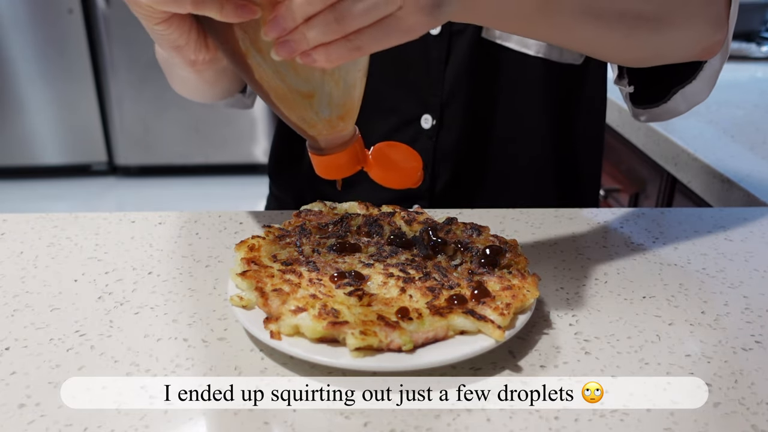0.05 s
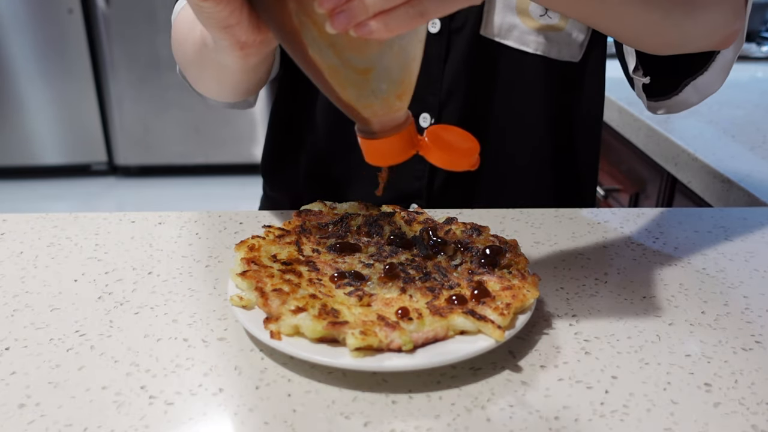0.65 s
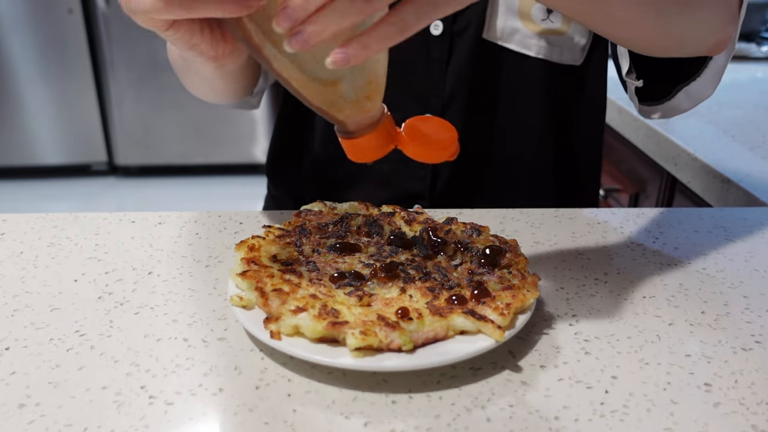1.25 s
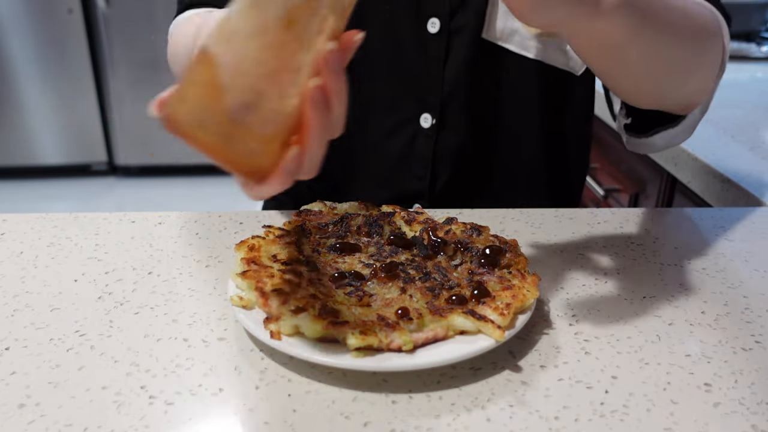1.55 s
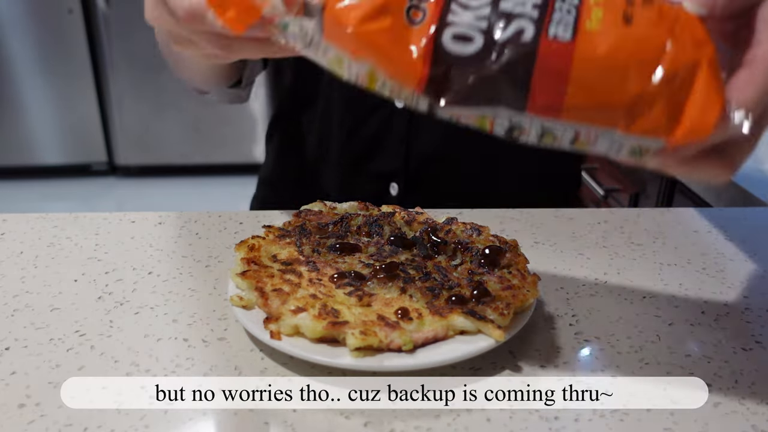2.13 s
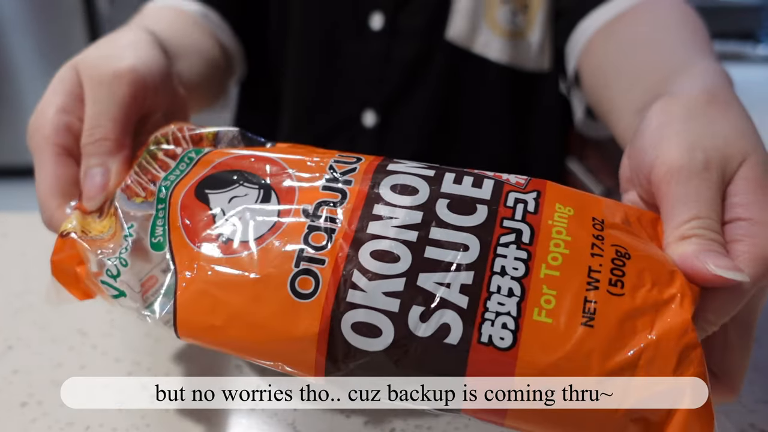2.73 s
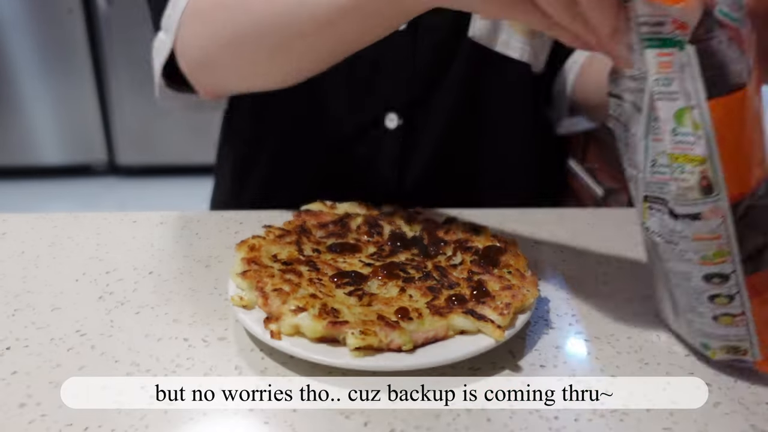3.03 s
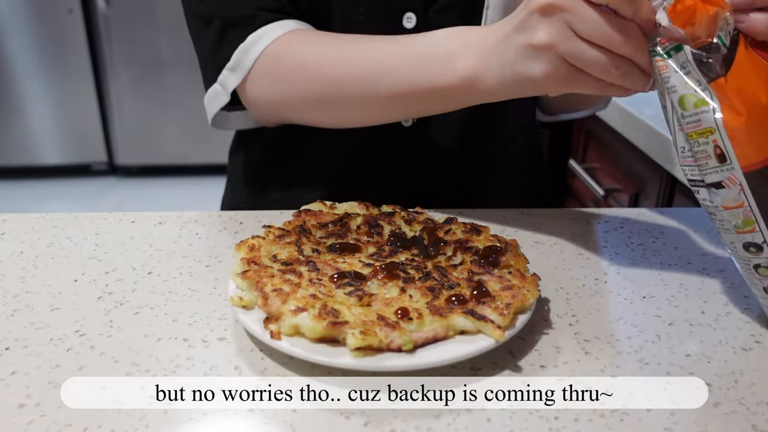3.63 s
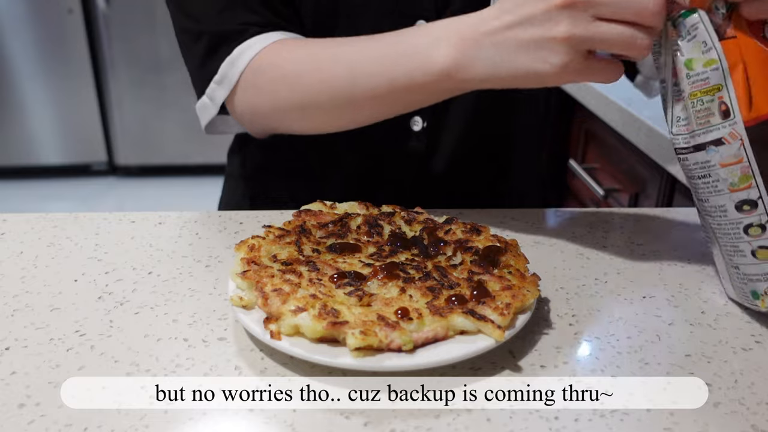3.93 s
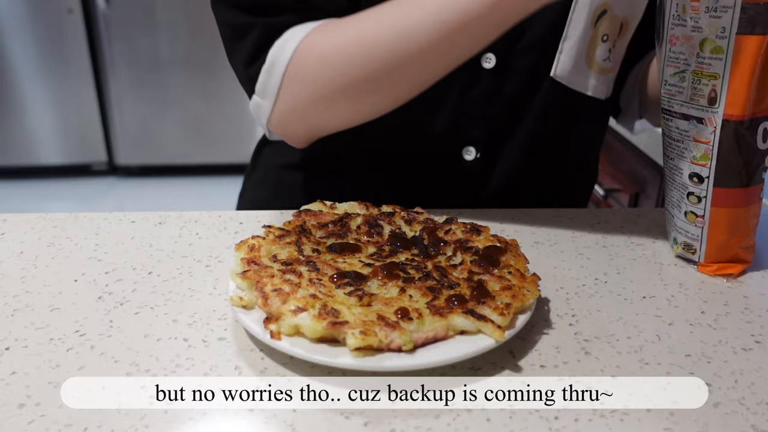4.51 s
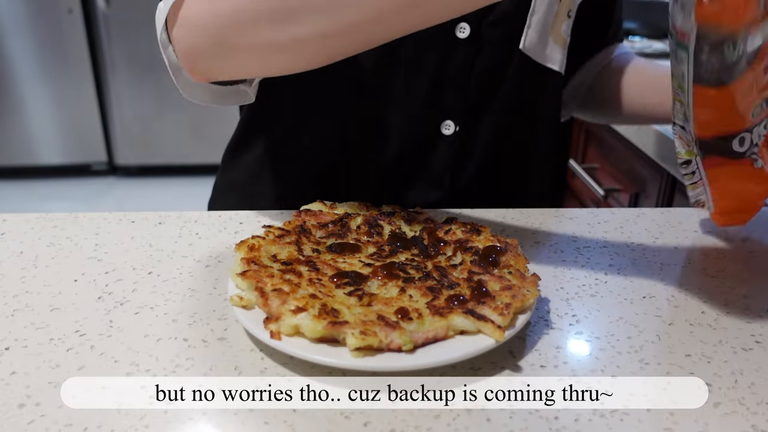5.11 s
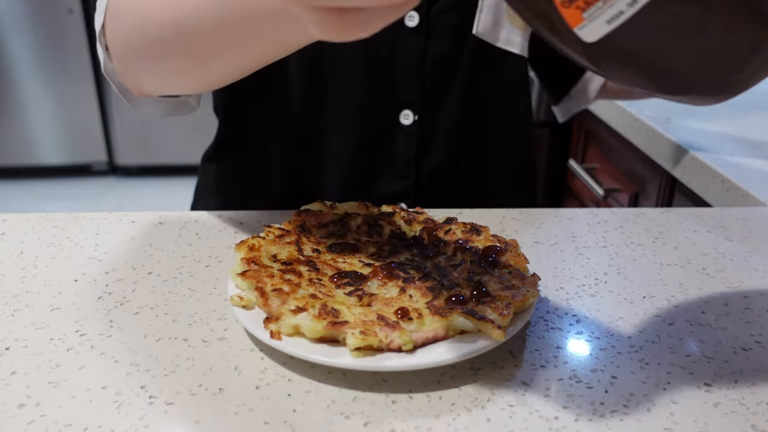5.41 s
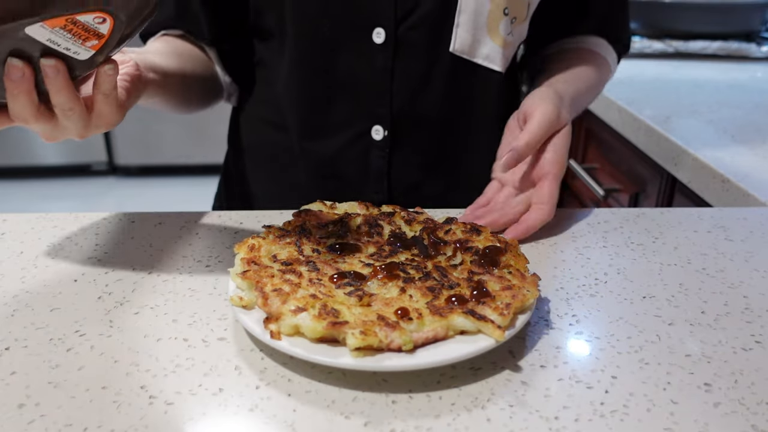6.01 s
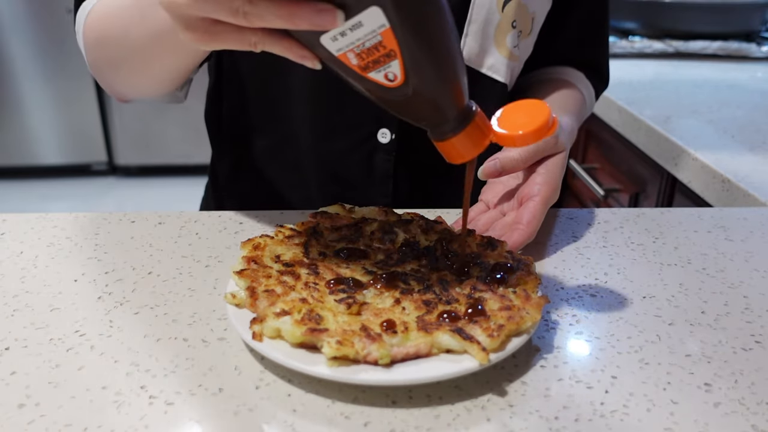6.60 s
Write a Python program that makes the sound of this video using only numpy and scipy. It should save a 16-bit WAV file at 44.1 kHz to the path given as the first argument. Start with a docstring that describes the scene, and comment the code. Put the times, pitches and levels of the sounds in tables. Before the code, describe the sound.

Close up in a small, hard-walled kitchen, quick squeezes force the last sauce from a plastic bottle in hissing, bubbly spurts, and the dented plastic cracks twice. Next a full bottle is handled and unwrapped: its film bag crackles densely, the bottle bumps softly on the counter, and one loud snap stands out late on. The crinkling dies away, leaving the faint appliance hum that runs underneath throughout.

```python
"""Over a faint appliance hum, a nearly empty plastic squeeze bottle spits air and the last of its sauce:
wet sputters at the nozzle, bursting bubbles, and two cracks as the dented wall springs back.
Then a full bottle is handled in its film bag, stood on the kitchen counter and unwrapped: the film
crinkles and snaps as it buckles, and the bottle lands dull thuds. The small hard room rings a little."""
import sys
import numpy as np
from scipy import signal
from scipy.io import wavfile
from scipy.ndimage import uniform_filter1d, minimum_filter1d

SR = 44100
rng = np.random.default_rng(int(sys.argv[2]) if len(sys.argv) > 2 else 0)


def to_wav(sig):
    """Store sig (one row per channel, or 1-D mono) as 16-bit WAV at the path in sys.argv[1].

    Samples outside -1..1 are clipped; the rate is SR.
    """
    pcm = np.clip(np.atleast_2d(sig), -1, 1) * 32767
    pcm = np.round(pcm).astype(np.int16)
    wavfile.write(sys.argv[1], SR, pcm.T)  # frames by channels


N = 297669
TIME_S = np.arange(N) / SR


def gain_of(db):
    """Decibels to gain."""
    return 10 ** (np.asarray(db) / 20)


def unit_rms(x):
    """Scales to rms 1."""
    return x / np.sqrt(np.mean(x ** 2) + 1e-20)


def curve_at(points, hz):
    """Reads a curve on a log-frequency axis."""
    freqs, values = np.transpose(points)
    return np.interp(np.log(hz + 1), np.log(freqs + 1), values)


def add(mix, start_s, sound):
    """Lays a sound into the mix."""
    part = mix[max(round(start_s * SR), 0):][:len(sound)]
    part += sound[:len(part)]


def band(x, low_hz, high_hz, order=2):
    """Band-pass, kept below half the sample rate."""
    high_hz = min(high_hz, SR / 2.1)
    low_hz = min(low_hz, high_hz / 2 ** 0.1)
    return signal.sosfilt(signal.butter(order, [low_hz, high_hz], "band", fs=SR, output="sos"), x)


def resonate(x, hz, width_hz):
    """One resonant peak."""
    return signal.lfilter(*signal.iirpeak(hz, hz / width_hz, fs=SR), x)


def colour(x, eq, size=2048):
    """Minimum-phase EQ with power gain 1."""
    log_gain = np.log(gain_of(curve_at(eq, abs(np.fft.fftfreq(size, 1 / SR)))))
    taps = np.fft.ifft(np.exp(np.conj(signal.hilbert(log_gain)))).real[:size // 2]
    return signal.oaconvolve(x, taps / np.linalg.norm(taps))[:len(x)]


def burst(decay_s):
    """Noise that dies away exponentially."""
    t = np.arange(int(10 * decay_s * SR) + 256) / SR
    return rng.standard_normal(len(t)) * np.exp(-t / decay_s)


def sized(x, length_s):
    """Gives a hit the energy of rms 1 held for length_s."""
    return x / np.linalg.norm(x) * np.sqrt(length_s * SR)


def clicks(per_s, spread_db):
    """Random clicks: many small, a few large."""
    at = np.flatnonzero(rng.random(N) < per_s / SR)
    train = np.zeros(N)
    train[at] = rng.choice([-1, 1], len(at)) * gain_of(spread_db * rng.exponential(1, len(at)).clip(0, 4))
    return train


def levelled(x, size):
    """Rides the rms toward 1 over stretches of size samples, leaving the grain."""
    power = abs(uniform_filter1d(uniform_filter1d(x ** 2, size), size))
    return x / np.sqrt(power + np.mean(x ** 2) / 1000)


def gate(start_s, end_s, fade_s):
    """A soft on-off envelope."""
    return np.clip(np.minimum(TIME_S - start_s, end_s - TIME_S) / fade_s + .5, 0, 1)


def push(start_s, end_s, attack_s, sag_db_per_s, release_s):
    """Envelope of one push of the hand: a quick rise, a sagging hold, an exponential release."""
    rise = np.clip((TIME_S - start_s) / attack_s + .5, 0, 1)
    sag = gain_of(-sag_db_per_s * np.clip(TIME_S - start_s, 0, end_s - start_s))
    return rise * sag * np.exp(-np.maximum(TIME_S - end_s, 0) / release_s)


# EQ of the ventilation noise: freq_hz, gain_db
VENT_EQ = [(25, -19), (70, -28), (110, -19), (170, -3.5), (280, -2), (430, 2), (620, -3.5), (950, -12.5),
           (1400, -12), (2500, -18.5), (4700, -27), (6500, -29.5), (11000, -31.5), (16000, -36.5)]
# faint motor tones, stepping in pitch: start_s, end_s, pitch_hz, level_db
HUM_TONES = [(0, 1.66, 355, -50), (1.66, 5.94, 285, -49), (5.94, 6.8, 318, -49), (5.94, 6.8, 544, -56),
             (0, 6.8, 118, -68)]


def appliance():
    """A steady bed of air noise with a slightly wavering motor hum."""
    mid, side = (colour(rng.standard_normal(N), VENT_EQ) for _ in range(2))
    hum = np.zeros(N)
    for start_s, end_s, hz, db in HUM_TONES:
        waver = unit_rms(uniform_filter1d(rng.standard_normal(N), size=4000))
        cycles = np.cumsum(hz * (1 + 0.00627 * waver)) / SR
        hum += gain_of(db) * np.sqrt(2) * gate(start_s, end_s, fade_s=0.016) * np.sin(2 * np.pi * cycles)
    return gain_of(-44) * (mid + gain_of(-11) * np.array([side, -side])) + hum


# resonances of the bottle neck and nozzle: pitch_hz, width_hz, gain_db
NOZZLE_MODES = [(464, 150, 4.5), (840, 155, 2), (1150, 62, 5.5), (1417, 40, 1), (1860, 430, -2),
                (2770, 140, -12), (4370, 200, -2.5), (5300, 200, -22), (6160, 160, 1), (7560, 76, -8.5),
                (8550, 200, -17)]


def nozzle(x):
    """The cavity of neck and cap rings in several broad modes."""
    return sum(gain_of(db) * resonate(x, hz, width_hz) for hz, width_hz, db in NOZZLE_MODES)


# squeezes of air through the wet nozzle: start_s, end_s, air_db, sauce_db
SQUEEZES = [(.004, .06, -29, -30), (0.17, 0.221, -25.5, -22.5), (0.446, 0.501, -32, -31),
            (.533, 0.54, -30.5, -31), (0.606, 0.655, -30, -33.5), (0.767, 0.828, -29, -27),
            (0.97, 1.015, -32, -33.5), (1.11, 1.143, -30.5, -29), (1.284, 1.31, -34.5, -33.5)]
# EQ of the air rushing through the cap: freq_hz, gain_db
AIR_EQ = [(300, -22), (1000, -17), (2500, 2), (4500, 0), (8000, -3.5), (12000, -7.5), (16000, -7.5)]


def sputter():
    """Sauce films close and burst in the nozzle, chopping the escaping air."""
    air, sauce = np.zeros((2, N))
    for start_s, end_s, air_db, sauce_db in SQUEEZES:
        pressure = push(start_s, end_s, attack_s=0.012, sag_db_per_s=24, release_s=0.0029)
        seep = gain_of(-18) * gate(start_s - 0.011, end_s + 0.028, fade_s=0.011)
        flow = np.maximum(pressure, seep)
        air += gain_of(air_db) * flow
        sauce += gain_of(sauce_db) * flow
    film_bursts = clicks(per_s=480, spread_db=4)
    puffs = signal.lfilter([1], [1, -np.exp(-1 / (.0014 * SR))], abs(film_bursts))  # 1.4 ms decay
    jet = rng.standard_normal(N) * (.25 + unit_rms(puffs))
    sizzle = gain_of(2.5) * unit_rms(band(jet, 4600, 17000, order=1))
    hiss = colour(unit_rms(nozzle(jet)) + sizzle, AIR_EQ)
    spit = band(nozzle(film_bursts), 280, 3900)
    return air * levelled(hiss, size=500) + sauce * levelled(spit, size=500)


def froth(per_s=120, centre_hz=1300, spread_octaves=0.62, spread_db=3.5):
    """Small bubbles burst at random in each squeeze: rows of start_s, peak_db, nominal_pitch_hz."""
    rows = []
    for start_s, end_s, _, sauce_db in SQUEEZES:
        times_s = start_s + np.cumsum(rng.exponential(1 / per_s, 24))
        size, tone = np.clip(rng.standard_normal((2, 24)), -2, 2)
        peaks_db = sauce_db + 4 + spread_db * size
        pitches_hz = centre_hz * 2 ** (spread_octaves * tone)
        rows += [row for row in zip(times_s, peaks_db, pitches_hz) if row[0] < end_s]
    return rows


# sauce bubbles bursting in the neck: start_s, peak_db, nominal_pitch_hz
BIG_BUBBLES = [(.046, -12, 990), (0.1756, -8.5, 980), (.2075, -14, 900), (.306, -11, 630), (.452, -21, 414),
               (.4685, -17, 750), (0.7771, -11, 1150), (.806, -23, 835), (0.8112, -13, 1210),
               (0.8175, -16, 980), (.899, -20, 570), (.9815, -26, 750), (1.1189, -16, 1040),
               (1.212, -16.5, 590), (1.307, -13.5, 830), (1.333, -4.5, 786)]


def bubbles(decay_cycles=0.84):
    """Each bubble swells for a moment and rings the neck for a few cycles, sinking in pitch."""
    out, t = np.zeros(N), np.arange(SR // 16) / SR
    for start_s, db, hz in BIG_BUBBLES + froth():
        cycles = np.cumsum(hz * (0.91 + 0.074 * np.exp(-t / .004))) / SR
        swell = 1 - np.exp(-(t * hz / 1.13) ** 2)
        envelope = swell * np.exp(-t * hz / decay_cycles)
        add(out, start_s, gain_of(db) * envelope / envelope.max() * np.sin(2 * np.pi * cycles))
    return out


# stiff plastic snapping, the bottle wall or a whole fold of the bag:
# start_s, level_db, low_hz, high_hz, decay_s, neck_ring_db, room_send_db
PLASTIC_CRACKS = [(.2790, -3, 337, 4340, 0.0026, -13, -8), (1.3484, -5.5, 426, 4700, 0.0013, -5, -1),
                  (1.6816, -13, 2400, 10500, 0.0037, -20, -1.5),
                  (2.943, -3.5, 3540, 12020, 0.0012, -50, 1.5), (3.866, -7, 1998, 5060, 0.0029, -50, -1),
                  (4.6828, -10, 2800, 9000, 0.0025, -42, -3), (4.955, 6.5, 2895, 13070, 0.0035, -40, -11)]


def cracks():
    """A sharp snap, then a few milliseconds of rattling plastic; returns the dry hits and a room send."""
    direct, send = np.zeros((2, N))
    for start_s, db, low_hz, high_hz, decay_s, neck_db, room_db in PLASTIC_CRACKS:
        rattle = burst(decay_s)
        snap = signal.unit_impulse(len(rattle))
        drive = rattle + 9 * snap
        wall = band(drive, low_hz, high_hz, order=4)
        hit = wall + gain_of(neck_db) * nozzle(drive) + gain_of(-31) * drive
        add(direct, start_s, gain_of(db) * sized(hit, decay_s))
        bare_snap = band(snap, low_hz, high_hz, order=3)
        spread = band(bare_snap, low_hz / 2, 6 * low_hz, order=1)  # low notes spread widest
        add(send, start_s, gain_of(db + room_db - 2.5) * sized(spread, decay_s))
    return direct, send


# hollow ring of the air in the bottle: pitch_hz, gain_db, decay_s
CAVITY_MODES = [(375, -10, 0.0043), (700, 1.5, 0.0058), (1170, -3.5, 0.007)]


def cavity(attack_s=0.0011):
    """A snap that reaches the neck also rings the air in the bottle."""
    out, t = np.zeros(N), np.arange(SR // 16) / SR
    ring = sum(gain_of(db) * np.exp(-t / decay_s) * np.sin(2 * np.pi * hz * t)
               for hz, db, decay_s in CAVITY_MODES)
    ring *= 1 - np.exp(-t / attack_s)
    for start_s, db, _, _, _, neck_db, _ in PLASTIC_CRACKS:
        add(out, start_s, gain_of(db + neck_db + 3) * ring)
    return out


def crease(hz, ring_hz):
    """One buckle of film: a brief broad crack, a weaker flutter and the short ring of its own facet."""
    crack, t = np.zeros(SR // 20), np.arange(SR // 20) / SR
    add(crack, 0, burst(decay_s=.001))
    add(crack, 0, gain_of(-14) * burst(decay_s=.005))  # flutter
    body = band(crack, hz / 2.05, hz * 1.8)
    ring = np.exp(-t / .0017) * np.sin(2 * np.pi * ring_hz * t)
    return unit_rms(body) + gain_of(2) * unit_rms(crack) + gain_of(-3.5) * unit_rms(ring)


def stereo_creases(rows, ring_ratio=.76, spread_octaves=.24):
    """Plays single creases, each a little different left and right."""
    out = np.zeros((2, N))
    for start_s, db, hz in rows:
        rings_hz = hz * ring_ratio * 2 ** (spread_octaves * rng.uniform(-2.004, 2.02, 2))
        mid, side = (sized(crease(hz, ring_hz), length_s=.004) for ring_hz in rings_hz)
        side = gain_of(-19.5) * side + rng.normal(0, 0.065) * mid
        for channel, sound in zip(out, (mid + side, mid - side)):
            add(channel, start_s, gain_of(db) * sound)
    return out


# accents in the crinkle of the bag: start_s, level_db, brightness_hz
LOUD_CREASES = [(1.61, -37, 7700), (1.809, -23.5, 6100), (1.85, -19, 8700), (1.874, -14, 10400),
                (1.926, -23, 7900), (1.957, -11, 9400), (1.968, -18.5, 7940), (2.022, -14.5, 7300),
                (2.029, -12.5, 7400), (2.06, -14, 7500), (2.109, -15, 8000), (2.144, -17, 7900),
                (2.199, -19, 7500), (2.24, -16, 6600), (2.265, -9, 9800), (2.307, -15.5, 6300),
                (2.313, -12.5, 7300), (2.338, -14, 8800), (2.37, -10.5, 7200), (2.379, -13.5, 6200),
                (2.4, -9.5, 9300), (2.433, -21, 6800), (2.472, -15, 5800), (2.498, -13, 9800),
                (2.544, -5.5, 8000), (2.596, -13, 8000), (2.635, -11.5, 6200), (2.683, -15, 6000),
                (2.72, -15.5, 4200), (2.778, -22.5, 7100), (2.84, -21, 7500), (2.997, -20, 5300),
                (3.039, -16, 7300), (3.19, -7, 5600), (3.296, -8.5, 9400), (3.344, -7, 7600),
                (3.37, -9, 7600), (3.446, -4, 6100), (3.497, -7, 6500), (3.53, -4, 5100),
                (3.597, -11.5, 5300), (3.657, -10, 5100), (3.67, -9, 5400), (3.7, -9, 7100),
                (3.76, -15, 5600), (3.796, -2, 6500), (3.894, -4.5, 6400), (4.125, -7.5, 8900),
                (4.173, -11, 8200), (4.213, -8, 7000), (4.272, -11, 6300), (4.488, -13.5, 7100),
                (4.536, -11.5, 7300), (4.635, -9.5, 7100), (4.645, -9, 5700), (4.855, -12.5, 5100),
                (4.88, -9.5, 7500), (4.9, -13, 7500), (5.024, -12, 6000), (5.29, -5, 8600),
                (5.354, -14, 9100), (5.367, -7, 6100), (5.409, -11, 7700), (5.462, -13, 9000),
                (5.506, -10, 9600), (5.551, -7.5, 5500), (5.635, -19, 6505), (5.715, -23, 3700),
                (5.898, -30, 8907), (5.923, -32, 8700)]


def loud_creases():
    """The film buckles in distinct, bright ticks."""
    return stereo_creases(LOUD_CREASES)


# moves of the hands that crumple the bag: start_s, end_s, effort_db, broad_panel_db, sharp_edge_db
HAND_MOVES = [(1.853, 1.901, -30, -2.5, 2), (1.943, 1.971, -20, -2, -2), (2.118, 2.227, -16.5, -2, -1),
              (2.254, 2.281, -21, -4, -2), (2.315, 2.345, -18, 0.5, -1), (2.402, 2.48, -19.5, -1.5, -3),
              (2.555, 2.64, -19, 3, 0), (2.676, 2.718, -28, 5, -0.5), (2.85, 2.931, -25, -1, -3.5),
              (2.945, 3.241, -15.5, 2, -0.5), (3.306, 3.352, -19, 0.5, 1), (3.365, 3.549, -15.5, -1.5, -.5),
              (3.777, 3.809, -14.5, 0, 0), (3.841, 3.919, -21.5, 0, 0.5), (3.927, 4.111, -13.5, -1, -0.5),
              (4.209, 4.487, -13, -0.5, -.5), (4.628, 4.655, -21, -4, -3), (4.683, 4.739, -12.5, -2.5, -3),
              (4.75, 4.971, -18, 0.5, 0), (5.035, 5.06, -18.5, -2.5, -10), (5.065, 5.089, -8.5, 1.5, -5),
              (5.10, 5.293, -12.5, 1.5, 2.5), (5.298, 5.409, -22, 1, 0), (5.547, 5.562, -19.5, 5, -0.5)]
# fingers still stirring the film between moves: start_s, end_s, effort_db
RESTING_GRIPS = [(1.942, 2.659, -28), (2.929, 3.63, -24.5), (3.63, 3.77, -30), (3.77, 4.52, -23.5),
                 (4.519, 5.599, -30), (5.602, 5.731, -35)]


def hand_effort():
    """How hard the hands work the film: the strongest of the moves and the resting grip."""
    moves = [gain_of(db) * push(start_s, end_s, attack_s=.016, sag_db_per_s=14, release_s=.014)
             for start_s, end_s, db, _, _ in HAND_MOVES]
    grip = sum(gain_of(db) * gate(start_s, end_s, fade_s=.05) for start_s, end_s, db in RESTING_GRIPS)
    return np.max(moves + [grip], axis=0)


def hand_tone():
    """Each move sets the panel and edge gains in dB, which hold until the next move."""
    starts_s, _, _, panel_db, edge_db = np.transpose(HAND_MOVES)
    move = np.maximum(np.searchsorted(starts_s, TIME_S) - 1, 0)
    return [uniform_filter1d(db[move], size=200) for db in (panel_db, edge_db)]


def lesser_creases(effort, usual_effort_db=-18, per_s=52, centre_hz=7130, spread_octaves=0.32):
    """Strain builds and lets go in creases at uneven intervals; more effort makes more and louder ones."""
    jitter, sizes, tones = rng.standard_normal((400, 3)).T
    extra_db = 20 * np.log10(effort + 1e-9) - usual_effort_db
    strain = np.cumsum(per_s * gain_of(.15 * extra_db)) / SR
    onsets = np.searchsorted(strain, np.arange(1, len(jitter) + 1) + .3 * jitter)
    level_db = -14.5 + 0.55 * extra_db
    return stereo_creases((i / SR, level_db[i] + 2.5 * size, centre_hz * 2 ** (spread_octaves * tone))
                          for i, size, tone in zip(onsets, sizes, tones) if i < N)


def crackle(decay_s=0.0018):
    """A stereo swarm of tiny buckles, each a fresh noise burst with a sudden start."""
    swarm = np.zeros((2, N))
    for k, hz in enumerate(np.geomspace(3300, 13000, num=6)):
        buckles = clicks(per_s=200, spread_db=3)
        energy = signal.lfilter([1], [1, -np.exp(-2 / (decay_s * SR))], buckles ** 2)
        grains = np.sqrt(energy + 1e-12) * rng.standard_normal(N)
        swarm[k % 2] += band(grains, hz / 1.06, hz * 1.38, order=1) + gain_of(-3.5) * grains
    return np.array([levelled(channel, size=700) for channel in swarm + 0.9 * swarm[::-1]])


# EQ of the crinkling film: freq_hz, gain_db
FILM_EQ = [(60, -25), (150, -15.5), (300, -4.5), (700, -3), (1150, -4), (1600, -2), (2700, 0), (3200, 1.5),
           (4200, -1), (6000, -2), (9000, -1.5), (13000, -1.5), (16000, -2.5)]
# ring of film pulled taut at the neck of the standing bag: start_s, end_s, pitch_hz, width_hz, gain_db
TAUT_RINGS = [(3.317, 5.11, 3173, 220, -7.5), (3.307, 5.123, 3772, 300, -10.5)]
# pan, following where the bag is held: time_s, left_minus_right_db
BAG_PAN = [(1.85, 0), (2.31, 0), (3.26, -1.5), (4.79, -1.5), (5.44, -3.5), (5.8, -2.5)]


def bag():
    """Single creases over a swarm of small ones; the hands set how dull or sharp the film is."""
    swarm, effort = crackle(), hand_effort()
    panel_db, edge_db = hand_tone()
    film = loud_creases() + lesser_creases(effort) + gain_of(0.37) * effort * swarm
    film = np.array([colour(channel, FILM_EQ) for channel in film])
    panels = signal.sosfiltfilt(signal.butter(4, 2700, fs=SR, output="sos"), film)
    edges = signal.sosfiltfilt(signal.butter(2, 7300, "high", fs=SR, output="sos"), film)
    bright = film - panels + (gain_of(edge_db) - 1) * edges
    for start_s, end_s, hz, width_hz, db in TAUT_RINGS:
        bright += gain_of(db) * gate(start_s, end_s, fade_s=0.066) * resonate(film, hz, width_hz)
    pan_db = np.interp(TIME_S, *np.transpose(BAG_PAN))
    bright *= gain_of([pan_db / 2, -pan_db / 2])
    body = gain_of(panel_db) * panels.mean(0)  # long waves from broad panels reach both sides alike
    return (bright + body) * gain_of(-.35 * edge_db)  # sharp edges take energy from the mids


# the full bottle bumping the counter and the hands: start_s, level_db, pitch_hz, decay_s
BOTTLE_BUMPS = [(2.994, -26.5, 240, 0.032), (3.030, -24, 161, 0.04), (3.043, -22, 268, 0.034),
                (3.155, -29, 160, 0.025), (3.780, -37, 282, 0.019), (3.95, -41, 224, 0.026),
                (4.277, -29, 158, 0.015), (4.407, -37.5, 300, 0.017), (4.451, -32, 230, 0.018),
                (5.545, -36, 380, 0.0097), (5.713, -32.5, 277, 0.012)]


def bumps():
    """Dull, well-damped thuds of a bottle full of sauce."""
    out = np.zeros(N)
    for start_s, db, hz, decay_s in BOTTLE_BUMPS:
        body = band(burst(decay_s), hz / 1.5, hz * 1.5)
        thud = band(body, 150, 2500, order=5)
        add(out, start_s, gain_of(db) * sized(thud, decay_s))
    return out


# reverb time of the kitchen: freq_hz, t60_s
ROOM_DECAY = [(150, 0.39), (800, 0.35), (2000, 0.42), (5000, 0.41), (10000, 0.38), (16000, 0.27)]
# stereo width of the reverb: freq_hz, side_minus_mid_db
ROOM_WIDTH = [(100, -25), (1000, -9.5), (2500, -15.5), (5000, -10.5), (16000, -0.5)]


def kitchen():
    """The room's tail: dense reflections, each band dying at its own speed, wider in the treble."""
    hz, t, bands = signal.stft(rng.standard_normal((2, SR * 2 // 3)), SR, nperseg=256)
    bands *= gain_of(-60 * t / curve_at(ROOM_DECAY, hz)[:, None])
    bands[1] *= gain_of(curve_at(ROOM_WIDTH, hz))[:, None]
    mid, side = signal.istft(bands, SR, nperseg=256)[1]
    fade_in = np.clip((TIME_S[:len(mid)] - .002) / .001, 0, 1)  # opens after 2 ms
    tail = np.array([mid + side, mid - side]) * fade_in
    return tail / np.linalg.norm(tail[0])


def scene():
    """Bottles and bag up close, each sound with its own reverb send, over the appliance bed."""
    tail, bed, spit, thuds = kitchen(), appliance(), sputter(), bumps()
    pops = bubbles() + cavity()
    snaps, snap_send = cracks()
    film = bag()
    send = gain_of(-6.5) * (spit + thuds) + gain_of(-8) * pops + snap_send + gain_of(-9.5) * film.mean(0)
    room = signal.fftconvolve(send[None], tail, axes=1)[:, :N]
    close = (spit + pops + snaps + thuds) * gain_of([[.2], [-.2]])  # a hair left of centre
    return close + film + room + bed * gain_of([[.6], [-.6]])


def record(dry, low_cut_hz=90, high_cut_hz=16000):
    """A low cut, a fast limiter that holds peaks at full scale, then a steep high cut."""
    cut = signal.sosfilt(signal.butter(2, low_cut_hz, "high", fs=SR, output="sos"), dry)
    safe_gain = 1 / np.maximum(abs(cut).max(0), 1)
    limited = cut * uniform_filter1d(minimum_filter1d(safe_gain, size=45), size=45)
    taps = signal.firwin(511, high_cut_hz, window=("kaiser", 9), fs=SR)
    return signal.oaconvolve(limited, taps[None], "same")


dry = scene()
out = record(dry)
to_wav(out)
```